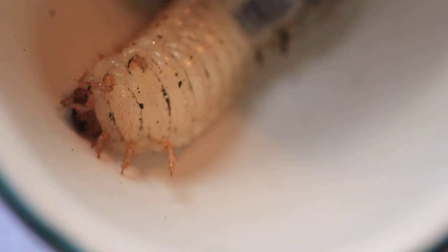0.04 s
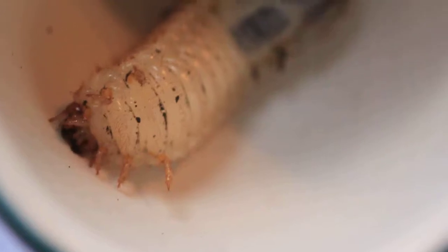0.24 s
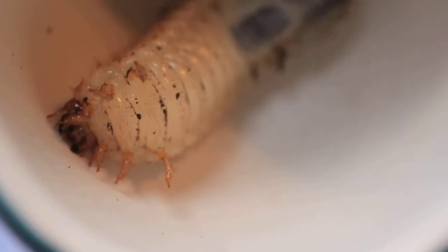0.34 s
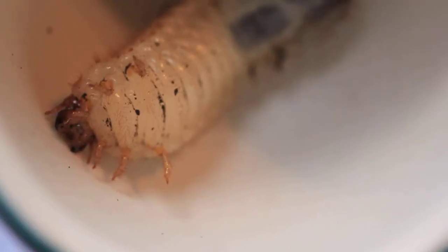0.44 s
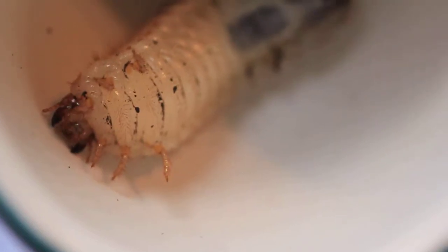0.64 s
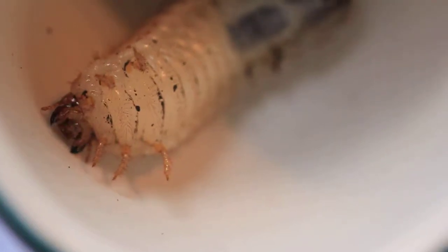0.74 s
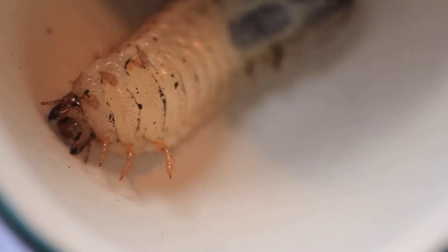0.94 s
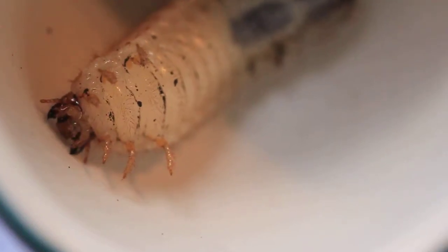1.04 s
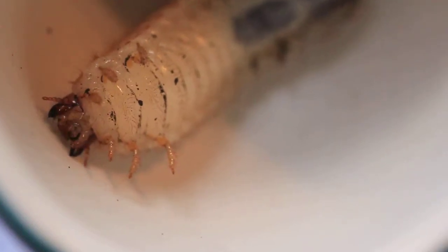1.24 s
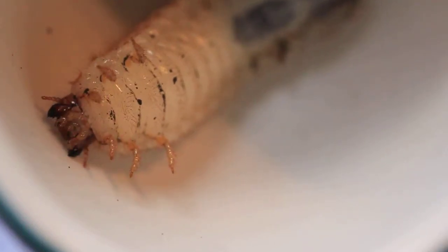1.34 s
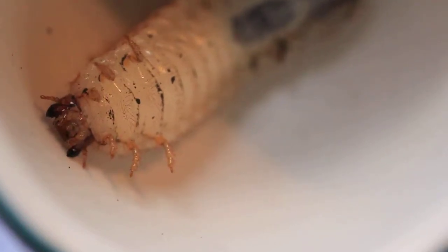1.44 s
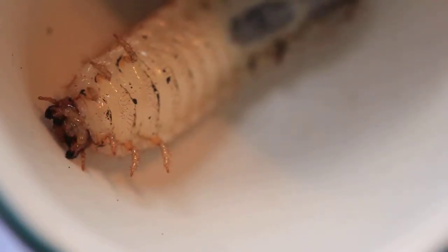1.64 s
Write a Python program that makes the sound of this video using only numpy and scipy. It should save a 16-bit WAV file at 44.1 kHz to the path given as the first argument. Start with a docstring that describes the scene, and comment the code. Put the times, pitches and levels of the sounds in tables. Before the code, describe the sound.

A beetle larva rasps faintly in a dish after a knock and sharp double click.

```python
"""Beetle larva in a dish

A small room, the camera's microphone close to the dish. Handling gives a dull knock that rings the
dish, then a sharp double click. A faint, dry friction rasp follows: one weak stroke and one long one,
which starts with a low scrape on the dish. A steady hiss lies under it all."""
import sys
import numpy as np
from scipy import signal
from scipy.fft import rfft, irfft, next_fast_len
from scipy.io import wavfile

SR = 44100
rng = np.random.default_rng(int(sys.argv[2]) if len(sys.argv) > 2 else 0)


def generate_wav(sig):
    """Save sig (samples, or channels by samples) to the path in sys.argv[1] as 16-bit PCM at SR."""
    pcm = np.round(np.clip(np.atleast_2d(sig).T, -1, 1) * 32767).astype(np.int16)
    wavfile.write(sys.argv[1], SR, pcm)


N = 74970
T = np.arange(N) / SR

# effort of the weak first stroke (time [s], level [dB])
WEAK_EFFORT = [(.25, -70), (.34, -52.5), (.42, -52), (.47, -53), (.55, -61.5), (.65, -58.5), (.73, -50.5),
               (.84, -76)]
# spectrum of the weak stroke (frequency [Hz], level [dB])
WEAK_SPECTRUM = [(100, -15), (330, 1.5), (900, -3.5), (1900, -1.5), (3000, -2.5), (4200, -4), (6200, -3.5),
                 (8000, -12.5), (11000, -11.5), (16000, -25)]
# effort of the long stroke (time [s], level [dB])
LONG_EFFORT = [(.62, -80), (.74, -52), (.9, -47.5), (1.12, -47), (1.3, -48), (1.45, -50.5), (1.58, -56),
               (1.7, -81)]
# spectrum of the long stroke (frequency [Hz], level [dB])
LONG_SPECTRUM = [(100, -20), (220, -1.5), (450, -4), (950, -0.5), (1900, -1.5), (3000, -2.5), (5500, -6),
                 (8000, -10.5), (12000, -14.5), (16000, -25)]
# hollow resonance climbing through the long stroke (time [s], centre [Hz], level [dB])
HOLLOW_GLIDE = [(.8, 520, -80), (0.919, 550, -57.5), (1.01, 610, -54), (1.07, 720, -65), (1.2, 833, -62),
                (1.319, 932.4, -53.5), (1.4, 956, -62), (1.6, 897, -56.5), (1.7, 892, -66)]
# spectrum of the scrape on the dish (frequency [Hz], level [dB])
SCRAPE_SPECTRUM = [(100, -13), (220, -8), (370, 4), (800, -3.5), (1060, 4.5), (1350, -2.5), (1800, -1.5),
                   (2200, -4), (2480, 1.5), (3200, -7.5), (4200, -12), (12000, -26)]
# resonances stirred by the rubbing (time [s], spread [s], centre [Hz], width [Hz], level [dB])
RUB_RESONANCES = [(.35, 0.035, 1854, 450, -57.5), (.79, 0.039, 351.6, 140, -56),
                  (1.19, 0.11, 1544, 300, -57.5), (1.54, 0.12, 251.9, 108, -64.5)]
# low hums under the scrape (time [s], spread [s], frequency [Hz], level [dB])
SCRAPE_HUMS = [(.84, 0.056, 213, -54.5), (.98, 0.064, 46.9, -62)]
# contacts that ring the dish (time [s], level [dB])
KNOCK_HITS = [(0.1183, -15.5), (0.122, -36)]
# modes of the dish (frequency [Hz], level [dB], t60 [s])
DISH_MODES = [(480, -13, 0.047), (627, -23, 0.1), (715, -22, 0.077), (890, -15, 0.037), (1222, -18, 0.052),
              (1470, -7, 0.021), (1630, -0.5, 0.021), (1840, -20, .025), (2310, -14.5, 0.021),
              (3160, -20.5, 0.046), (3980, -30, 0.023)]
# spectrum of the knock's first touch (frequency [Hz], level [dB])
TICK_SPECTRUM = [(500, 7), (3000, 3), (5400, 6), (8500, -11), (11000, -3), (16000, -13)]
# hard contacts of the click (time [s], level [dB])
CLICK_HITS = [(0.1467, -34), (0.1494, -23)]
# modes of the small clicking parts (frequency [Hz], level [dB], t60 [s])
PART_MODES = [(2090, -23, 0.068), (4082, -0.5, 0.012), (4350, -6, 0.011), (5200, -6.5, 0.013),
              (5986, -9, .022), (7260, -15, 0.01), (9370, -21, 0.0087)]
# spectrum of the click's crack and rattle (frequency [Hz], level [dB])
CRACK_SPECTRUM = [(250, -23), (650, 1), (1100, -7), (1700, 2.5), (3100, -2), (4200, -0.5), (6200, -1),
                  (10000, -6.5), (16000, -19)]
# spectrum of the handling rustle (frequency [Hz], level [dB])
RUSTLE_SPECTRUM = [(30, -3), (120, 1), (500, -9), (1000, -5), (1700, 2.5), (2100, -2), (3300, -4.5),
                   (4500, -27), (12000, -33)]
# reverberation of the small room (frequency [Hz], t60 [s])
ROOM_DECAY = [(150, 0.17), (1600, 0.44), (5000, 0.093), (12000, 0.072)]
# spectrum of the background hiss (frequency [Hz], level [dB])
HISS_SPECTRUM = [(20, -18), (50, -3.5), (100, -3.5), (250, -0.5), (600, -1.5), (950, 1.5), (1350, 0),
                 (1630, 1.5), (1950, 0), (3000, -3.5), (6000, -7), (10000, -12.5), (16000, -16)]


def rasp():
    """The larva, close up: two strokes, with a hollow resonance climbing through the second."""
    times, centre_hz, db = np.transpose(HOLLOW_GLIDE)
    hollow = amp(np.interp(T, times, db)) * resonance(np.interp(T, times, centre_hz), width_hz=390)
    return stroke(WEAK_EFFORT, WEAK_SPECTRUM) + stroke(LONG_EFFORT, LONG_SPECTRUM) + hollow


def stroke(effort, spectrum, catches_per_s=1600, catch_db=-10):
    """Fine friction: dense tiny catches merge into noise and swell with the effort."""
    catches = (rng.random(N) < catches_per_s / SR) * rng.standard_normal(N)
    grain = unit_rms(noise(spectrum) + amp(catch_db) * coloured(catches, spectrum))
    return amp(np.interp(T, *np.transpose(effort))) * grain


def scrape(start_s=0.7286, attack_s=0.016, hold_s=0.028, level_db=-43, fall_db_per_s=95):
    """The long stroke bites on the dish and hums briefly; both strokes stir dull resonances."""
    age = T - start_s
    fall_db = fall_db_per_s * np.maximum(age - attack_s - hold_s, 0)
    bite = amp(level_db - fall_db) * np.clip(age / attack_s, 0, 1) * noise(SCRAPE_SPECTRUM)
    groans = sum(amp(db) * swell(at, spread) * resonance(hz, width)
                 for at, spread, hz, width, db in RUB_RESONANCES)
    hums = sum(amp(db) * swell(at, spread) * np.sin(2 * np.pi * hz * T)
               for at, spread, hz, db in SCRAPE_HUMS)
    return bite + groans + hums


def knock(push_s=0.1168, push_hz=723, push_db=-21, tick_db=-31.5, room_db=-19):
    """Handling near the microphone: a bright tick, one soft push, then the dish rings briefly."""
    tick = amp(tick_db) * decay(start_s=0.1163, t60=0.016) * noise(TICK_SPECTRUM)
    push_wave = np.sin(2 * np.pi * push_hz * (T - push_s))
    push = -amp(push_db) * swell(push_s, spread_s=0.00067) * push_wave
    dish = sum(amp(db) * ring(at, DISH_MODES, attack_s=0.00056) for at, db in KNOCK_HITS)
    direct = tick + push + dish
    return direct + amp(room_db) * room(direct)


def clicks(crack_db=-7.5, rattle_db=-11.5, low_cut_hz=350, room_db=-25):
    """Two hard contacts close by: each a crack, short bright modes and a fine rattle after them."""
    direct = np.zeros(N)
    for at, db in CLICK_HITS:
        envelope = amp(crack_db) * decay(at, t60=0.0067) + amp(rattle_db) * decay(at, t60=0.068)
        direct += amp(db) * (envelope * noise(CRACK_SPECTRUM) + ring(at, PART_MODES, attack_s=0.0001))
    # the small parts radiate no bass
    direct = filtered(direct, lambda hz: (1j * hz / (low_cut_hz + 1j * hz)) ** 2)
    return direct + amp(room_db) * room(direct)


def rustle(level_db=-51.5):
    """Soft handling noise around the knock and clicks."""
    return amp(level_db) * swell(centre_s=0.17, spread_s=0.06) * noise(RUSTLE_SPECTRUM)


def room(direct):
    """The small room answers with a short tail; the treble dies first."""
    hz, t, bands = signal.stft(rng.standard_normal(SR // 2), SR, nperseg=256)
    fade = np.exp(-np.log(1000) * t / along(ROOM_DECAY, hz)[:, None])
    _, tail = signal.istft(bands * fade, SR, nperseg=256)
    return signal.fftconvolve(direct, tail / np.linalg.norm(tail))[:N]


def hiss(level_db=-53):
    """The steady noise floor at the microphone."""
    return amp(level_db) * noise(HISS_SPECTRUM)


def ring(start_s, modes, attack_s):
    """Struck, damped modes; their levels vary a little from hit to hit."""
    return sum(amp(db + rng.normal(0, 1)) * decay(start_s, t60, attack_s)
               * np.sin(2 * np.pi * hz * (T - start_s)) for hz, db, t60 in modes)


def resonance(centre_hz, width_hz):
    """Noise in a narrow band whose centre may move."""
    white = rng.standard_normal((2, N))
    slow = filtered(white, lambda hz: 1 / (1 + (2 * hz / width_hz) ** 4) ** 0.5)
    phase = 2 * np.pi * np.cumsum(centre_hz * np.ones(N)) / SR
    return unit_rms(slow[0] * np.cos(phase) + slow[1] * np.sin(phase))


def decay(start_s, t60, attack_s=0.0001):
    """Envelope of something struck: a quick rise, then 60 dB down in t60 seconds."""
    age = np.maximum(T - start_s, 0)
    return np.exp(-np.log(1000) * age / t60) * (1 - np.exp(-age / attack_s))


def swell(centre_s, spread_s):
    """A bell-shaped envelope."""
    return np.exp(-0.5 * ((T - centre_s) / spread_s) ** 2)


def noise(spectrum):
    """Fresh noise of the given spectrum, at rms 1."""
    return coloured(rng.standard_normal(N), spectrum)


def coloured(x, spectrum):
    """x shaped by the given spectrum, at rms 1."""
    return unit_rms(filtered(x, lambda hz: amp(along(spectrum, hz))))


def filtered(x, response):
    """x through a frequency response."""
    size = next_fast_len(N + 8192)
    return irfft(rfft(x, size) * response(np.fft.rfftfreq(size, 1 / SR)), size)[..., :N]


def along(points, hz):
    """Interpolate a table on a log frequency axis."""
    freqs, values = np.transpose(points)
    return np.interp(np.log(hz + 1), np.log(freqs + 1), values)


def unit_rms(x):
    """Scale to rms 1."""
    return x / np.sqrt(np.mean(x ** 2) + 1e-20)


def amp(db):
    """Decibels to gain."""
    return 10 ** (np.asarray(db) / 20)


def scene():
    """One close position at the dish, every source dead centre."""
    mono = rasp() + hiss() + scrape() + rustle() + knock() + clicks()
    return np.array([mono, mono])


def record(dry, low_cut_hz=30, overload_db=-15, start_s=0.071, fade_in_s=0.012, top_hz=15950):
    """The camera's microphone: low cut, rounded peaks, a quick fade from silence and a band limit."""
    low_cut = filtered(dry, lambda hz: hz ** 3 / np.sqrt(hz ** 6 + low_cut_hz ** 6))
    rounded = low_cut / (1 + (low_cut / amp(overload_db)) ** 4) ** (1 / 4)
    fade_in = np.sqrt(1 - np.exp(-np.maximum(T - start_s, 0) / fade_in_s))
    return filtered(rounded * fade_in, lambda hz: hz < top_hz)


dry = scene()
out = record(dry)
generate_wav(out)
```